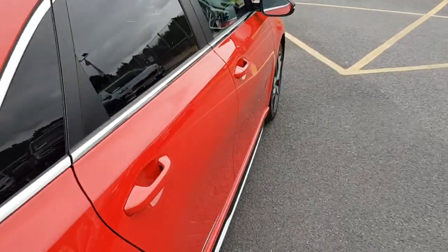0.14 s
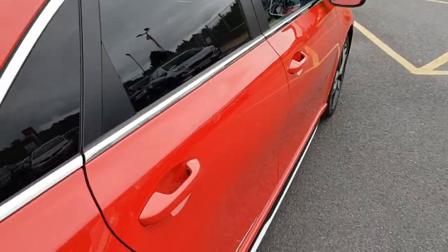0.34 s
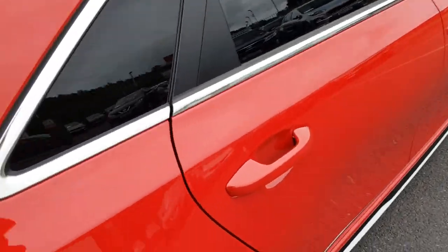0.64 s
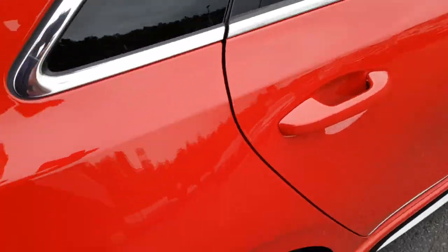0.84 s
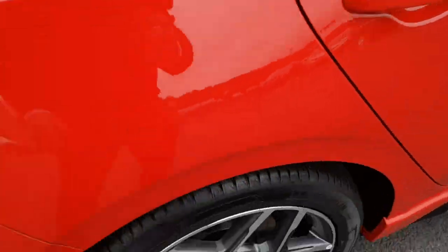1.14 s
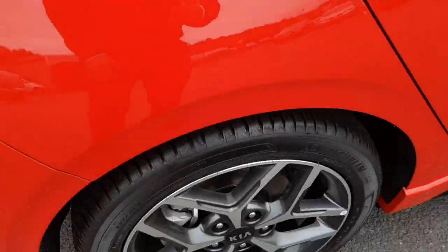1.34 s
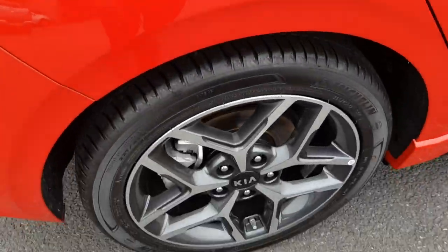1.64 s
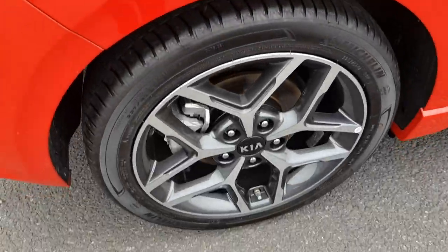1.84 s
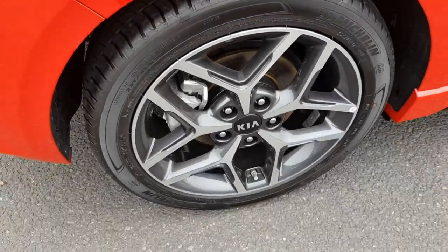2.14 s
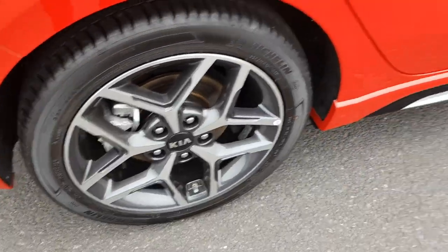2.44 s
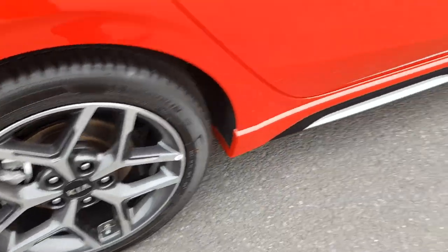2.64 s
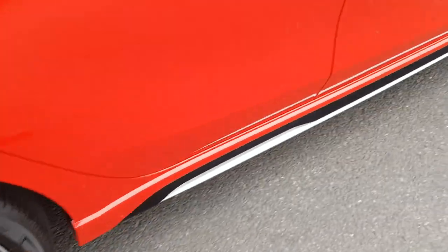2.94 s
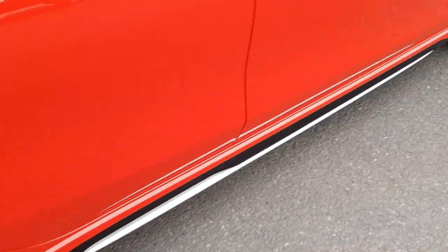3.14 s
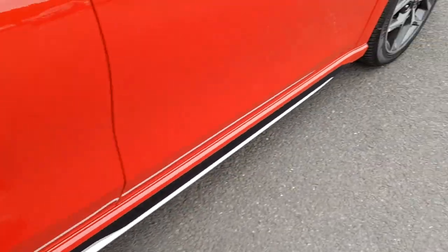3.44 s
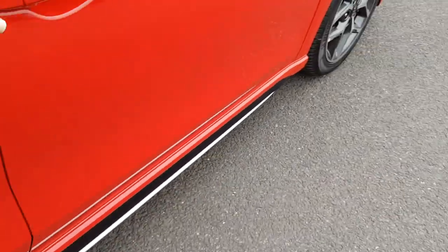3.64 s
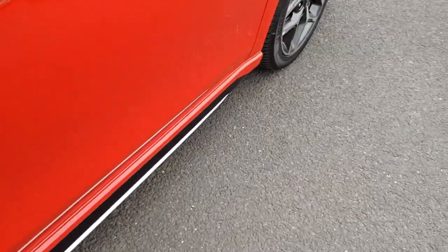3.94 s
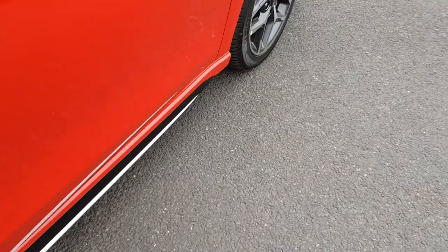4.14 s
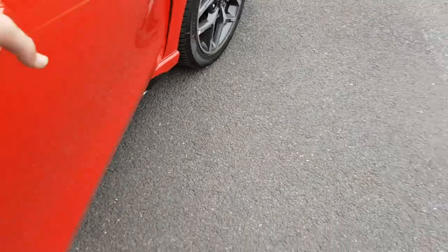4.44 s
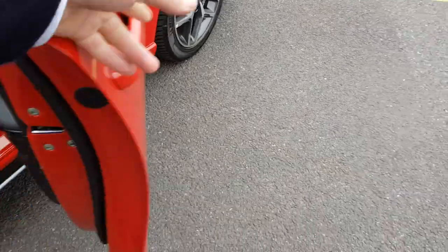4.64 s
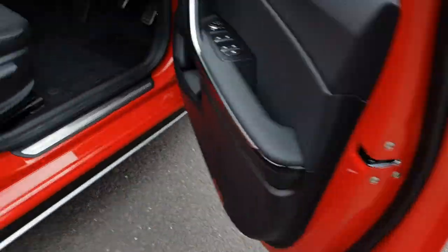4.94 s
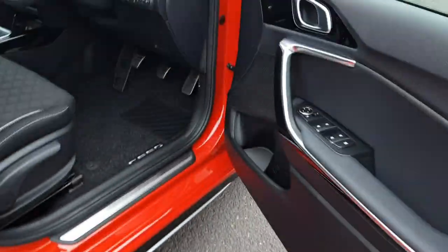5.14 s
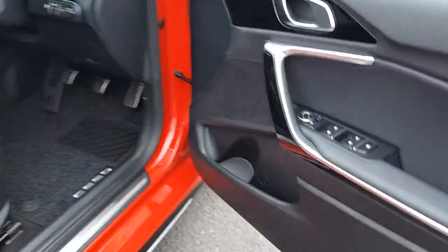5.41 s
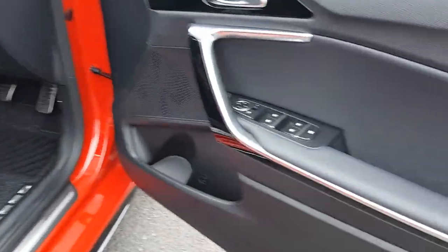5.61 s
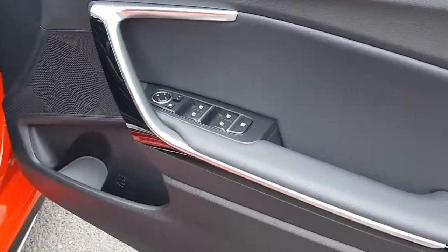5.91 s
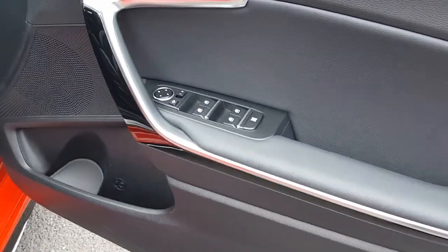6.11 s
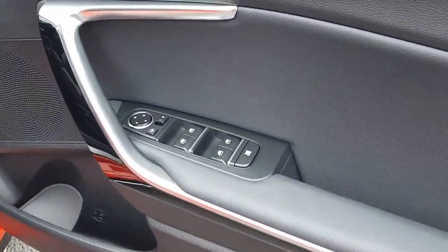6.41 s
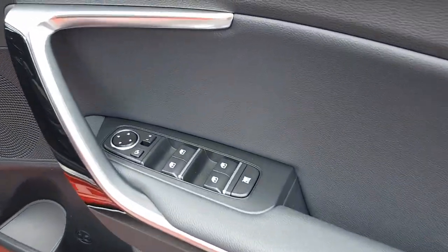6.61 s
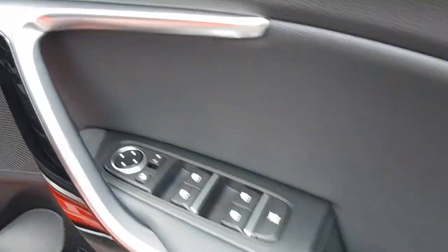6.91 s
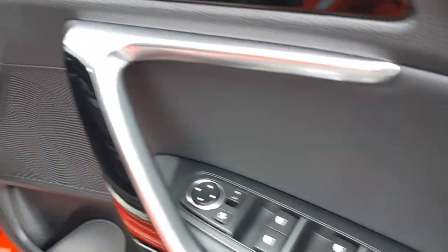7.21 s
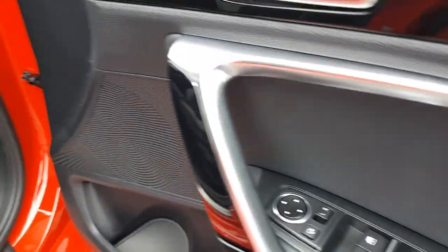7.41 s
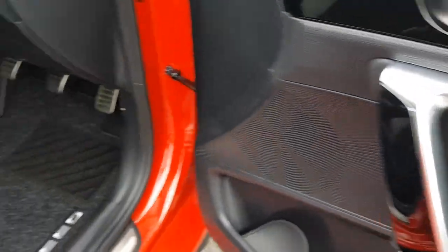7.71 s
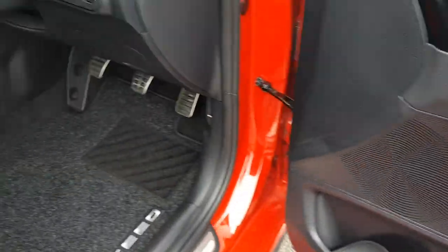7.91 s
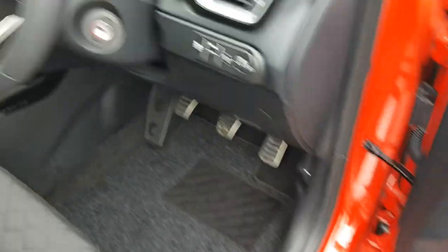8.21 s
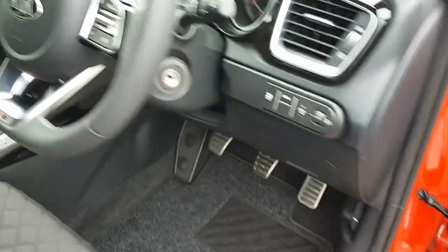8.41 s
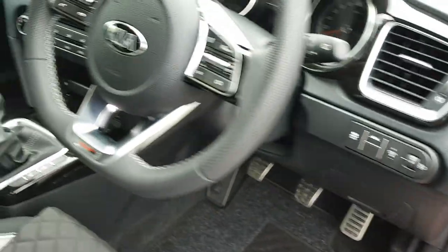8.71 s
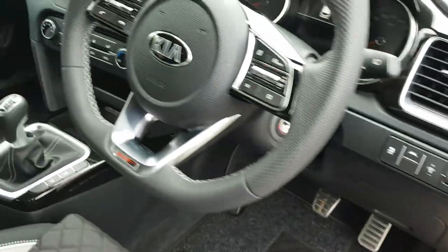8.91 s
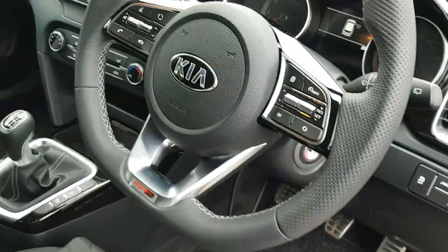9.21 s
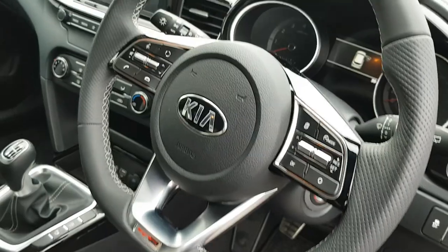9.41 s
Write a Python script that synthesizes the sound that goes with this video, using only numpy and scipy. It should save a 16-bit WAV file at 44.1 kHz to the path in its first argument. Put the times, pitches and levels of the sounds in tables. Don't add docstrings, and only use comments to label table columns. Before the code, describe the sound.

Outdoors in an open yard beside a busy road, heard by a hand-held phone. Cars stream past with low rumble and tyre roar. Small ticks, then a heavy car door slams close on the left, booming and rattling briefly, with a dull echo. The traffic dips in level, then recovers. Around four seconds a handle clicks, a lighter door unlatches and brushes open. Engine drone and passing cars continue.

```python
import sys
import numpy as np
from scipy import signal
from scipy.fft import rfft, irfft, next_fast_len
from scipy.io import wavfile
from scipy.ndimage import uniform_filter1d, map_coordinates

SR = 44100
rng = np.random.default_rng(int(sys.argv[2]) if len(sys.argv) > 2 else 0)


def undo_db(level):
    steps = np.asarray(level, float) / 20
    return 10 ** steps


def put_to_file(sound):
    columns = np.atleast_2d(sound).T
    safe = np.clip(columns, -1, 1)
    whole_steps = np.round(safe * 32767)
    wavfile.write(sys.argv[1], SR, whole_steps.astype(np.int16))


N = 421596
PORT_LAG = 21


def unit(x):
    return x / np.sqrt(np.mean(x ** 2) + 1e-20)


def along(points, hz):
    f, v = np.transpose(points)
    return np.interp(np.log(hz + 1), np.log(f + 1), v)


def curves(rows):
    s, *cols = np.transpose(rows)
    return [np.interp(np.arange(N) / SR, s, c) for c in cols]


def wobble(rate):
    steps = np.arange(0, N, 32)
    knots = rng.standard_normal(int(N * rate / SR) + 4)
    return np.interp(np.arange(N), steps, map_coordinates(knots, [steps * rate / SR]))


def filtered(x, response):
    m = next_fast_len(x.shape[-1] + 8192, True)
    return irfft(rfft(x, m) * response(np.fft.rfftfreq(m, 1 / SR)), m)[..., :x.shape[-1]]


def placed(x, side, pan_db):
    ears = np.array([[1], [-1]])
    travel_s = side * PORT_LAG / SR
    return filtered(x, lambda hz: undo_db(ears * pan_db / 2) * np.exp(-1j * np.pi * hz * travel_s * ears))


def ridged(x, centre_hz, octaves, lift_db):
    hz, t, z = signal.stft(x.astype(np.float32), SR, nperseg=1024)
    centre, lift = (np.interp(t, np.arange(N) / SR, v) for v in (centre_hz, lift_db))
    distance = np.log2((hz[:, None] + 1) / centre) / octaves
    ridge = lift * np.exp(-distance ** 2 / 2)
    return unit(signal.istft(z * undo_db(ridge).astype(np.float32), SR, nperseg=1024)[1][:, :N])


def swells(middle_s, half_s, order):
    t = np.arange(0, N, 64) / SR
    return 1 / (1 + np.abs((t - np.c_[middle_s]) / np.c_[half_s]) ** order)


def summed(shapes, db, floor_db):
    power = undo_db(db) ** 2 @ shapes + undo_db(floor_db) ** 2
    return np.interp(np.arange(N), np.arange(0, N, 64), 10 * np.log10(power))


def together(*db):
    return 10 * np.log10(sum(undo_db(one) ** 2 for one in db))


# f/Hz, share 0-1
DIRECT = [(60, 0.96), (200, 1), (400, 1), (900, 0.41), (2500, 0.43), (8000, 0.12)]


def rush(spectrum, right_share, patchy_db, size=N):
    z = signal.stft(rng.standard_normal((4, size), dtype=np.float32), nperseg=512)[2]
    field = uniform_filter1d(rng.standard_normal(z.shape[1:]), size=4, axis=0)
    field = uniform_filter1d(field, size=14, axis=1)
    noise = signal.istft(z * undo_db(patchy_db * unit(field)).astype(np.float32), nperseg=512)[1][:, :size]
    share = np.clip(right_share, 0, 1)
    late = np.roll(noise[:2], PORT_LAG, axis=1)
    from_right = np.sqrt(share) * np.array([late[0], noise[0]])
    from_left = np.sqrt(1 - share) * np.array([noise[1], late[1]])
    m = next_fast_len(size + 8192, True)
    hz = np.fft.rfftfreq(m, 1 / SR)
    clear = np.clip(along(DIRECT, hz), 0, 1)
    mixed = np.sqrt(clear) * rfft(from_right + from_left, m) + np.sqrt(1 - clear) * rfft(noise[2:], m)
    return unit(irfft(mixed * undo_db(along(spectrum, hz)), m)[:, :size])


# t/s nearest, half length/s, tyre roar level/dB, engine level/dB, tread song f/Hz
PASSES = [(-.1, 0.25, -35, -39.5, 830), (.3, 0.24, -32, -45.5, 850), (0.695, 0.2, -30, -43, 975),
          (2.703, 0.77, -36, -37.5, 900), (3.35, 0.66, -37, -47, 850), (3.926, 0.15, -35.5, -35, 780),
          (4.625, 0.23, -36.5, -44.5, 880), (5.004, 0.48, -34, -37, 700), (5.49, 0.43, -45, -43, 770),
          (6.608, 0.097, -38.5, -37.5, 760), (6.936, 0.4, -37.5, -38, 900),
          (7.402, 0.14, -39.5, -33.5, 950), (7.69, 0.23, -36.5, -31.5, 780), (8.56, 1, -38, -47, 870),
          (9.0, 0.46, -40.5, -47, 950)]
# t/s nearest, half length/s, roar level/dB, engine level/dB
PLAIN = [
    (1.35, 0.19, -36.5, -51.5),
    (2.112, 0.38, -34, -42.5),
    (6.303, 0.18, -40, -53),
    (8.105, 0.17, -47.5, -42),
    (9.6, 0.14, -37, -50),
]
FAR_ROAR_DB, FAR_BOOM_DB, FAR_TREAD_DB = -48, -54, -61.5
FAR_SONG_HZ = 850
DOPPLER, SHARP_DB = .04, 8.5
TREAD_OVER_ROAR_DB, PLAIN_TREAD_DB = -25.5, -23.5


def traffic():
    songless = [(*row, FAR_SONG_HZ) for row in PLAIN]
    s, half_s, roar_db, engine_db, song_hz = np.transpose([*PASSES, *songless])
    sings = np.arange(len(s)) < len(PASSES)
    near = swells(s, half_s, order=2)
    ahead = (np.c_[s] - np.arange(0, N, 64) / SR) / np.c_[half_s]
    heard = np.c_[undo_db(roar_db) ** 2] * near
    pitch = np.c_[song_hz] * (1 + DOPPLER * ahead / np.sqrt(1 + ahead ** 2))
    singing = heard[sings].sum(0)
    centre = (heard * pitch)[sings].sum(0) / singing
    sharp = SHARP_DB * singing / (heard.sum(0) + undo_db(FAR_ROAR_DB) ** 2)
    slow = [np.interp(np.arange(N), np.arange(0, N, 64), v) for v in (centre, sharp)]
    sizzle_db = summed(near, roar_db + np.where(sings, TREAD_OVER_ROAR_DB, PLAIN_TREAD_DB), FAR_TREAD_DB)
    return summed(near, roar_db, FAR_ROAR_DB), summed(near, engine_db, FAR_BOOM_DB), sizzle_db, *slow


# t/s middle, half length/s, level/dB, brightness/dB
SWISHES = [(0.453, .3, -59.5, 6.5), (1.25, .3, -63.5, 0), (2.352, 0.14, -64, -3), (2.78, 0.086, -63, 3),
           (2.97, .05, -64, 3), (3.31, 0.16, -66, 5), (3.667, 0.18, -61.5, 5), (4.1, 0.18, -61.5, 0.5),
           (4.503, 0.097, -49.5, -0.5), (4.69, .1, -52, -3), (4.886, 0.092, -53.5, 3.5),
           (5.246, 0.51, -63.5, -3), (6.36, .17, -65.5, 4.5)]
AIR_DB = -74
PUFF_S, PUFF_EVERY_S, PUFF_HALF_S = 5.79, .2525, .05
PUFF_DB, PUFF_FADES_DB_PER_S, PUFF_BRIGHT_DB = -67.5, .5, 0


def swish():
    s, half_s, db, bright_db = np.transpose(SWISHES)
    since = np.arange(16) * PUFF_EVERY_S
    puffs = swells(PUFF_S + since, np.full(len(since), PUFF_HALF_S), order=4)
    puff_db = summed(puffs, PUFF_DB - PUFF_FADES_DB_PER_S * since, -120)
    strokes = swells(s, half_s, order=4)
    brush_db = summed(strokes, db, AIR_DB)
    hiss_db = together(brush_db, puff_db)
    lifted_db = together(summed(strokes, db + bright_db, AIR_DB), puff_db + PUFF_BRIGHT_DB)
    return brush_db, hiss_db, lifted_db - hiss_db


# t/s, share 0-1
RIGHT = [(0, 0), (.7, 0.63), (1.05, 0.8), (1.7, 0.3), (2.2, 0.26), (2.6, 0.73), (3.5, 0.48), (4.5, 0.84),
         (5.5, 0.78), (6.5, 0.44), (7.5, 0.9), (8.5, 0.97), (9.56, 0.58)]
# f/Hz, level/dB per Hz
RUMBLE = [(13, -41.5), (28, -2), (45, 2.5), (65, 5.5), (151, -6), (220, -15), (290, -54), (480, -120)]
EXHAUST = [(120, -40), (180, 1.5), (250, 3.5), (350, 0), (480, -10.5), (700, -47)]
TYRES = [(300, -16.5), (430, -3), (560, -0.5), (700, -0.5), (900, 0), (1150, -1.5), (1500, -5.5),
         (1900, -11.5), (2400, -19), (3200, -49)]
TREAD = [(1400, -12.5), (2000, -6.5), (2900, -3), (4000, -13), (5500, -17.5), (7000, -29), (9000, -35)]
AIR = [(4000, -7), (6000, -8.5), (7260, -2), (8150, 0), (9560, -3.5), (11200, -2), (14200, -5),
       (15800, -14.5)]
RUMBLE_OVER_IDLE_DB, RUMBLE_OVER_ENGINE_DB, FAR_RUMBLE_DB = -4, 2, -37
TREAD_OVER_ENGINE_DB, TREAD_OVER_SWISH_DB = -26, -2.5
BRIGHT_HZ = 13000


def road():
    roar_db, exhaust_db, sizzle_db, centre_hz, sharp_db = traffic()
    brush_db, hiss_db, bright_db = swish()
    idle_db = curves(IDLE)[1]
    rumble_db = together(idle_db + RUMBLE_OVER_IDLE_DB, exhaust_db + RUMBLE_OVER_ENGINE_DB, FAR_RUMBLE_DB)
    tread_db = together(sizzle_db, exhaust_db + TREAD_OVER_ENGINE_DB, brush_db + TREAD_OVER_SWISH_DB)
    right, swell = curves(RIGHT)[0], wobble(6)
    low = undo_db(rumble_db + 2.0 + 0.26 * wobble(5.1)) * rush(RUMBLE, right, patchy_db=0.5)
    boom = undo_db(exhaust_db + 0.57 + 0.98 * wobble(25)) * rush(EXHAUST, right, patchy_db=1.0)
    sung = ridged(rush(TYRES, right, patchy_db=1.15), centre_hz, octaves=0.31, lift_db=sharp_db)
    roar = undo_db(roar_db + 4.0 + 0.37 * swell) * sung
    tread = undo_db(tread_db + 4.5 + .5 * swell) * rush(TREAD, right, patchy_db=1.0)
    spray = ridged(rush(AIR, right, patchy_db=2.5), np.full(N, BRIGHT_HZ), octaves=0.38, lift_db=bright_db)
    hiss = undo_db(hiss_db + 3.5 + 1.4 * wobble(20)) * spray
    return low + boom + roar + tread + hiss


def drone(rows, drift_hz, flutter_db):
    hz, db = curves(rows)
    first, last = rows[0][0], rows[-1][0]
    on = np.interp(np.arange(N) / SR, [first - .2, first, last, last + 0.35], [0, 1, 1, 0])
    phase = 2 * np.pi * np.cumsum(hz + drift_hz * wobble(11)) / SR
    return on * undo_db(db + 5.5 + flutter_db * wobble(7.4)) * np.sin(phase)


# t/s, firing rate f/Hz, level/dB
IDLE = [(0, 58.5, -35.5), (1.1, 58.5, -33), (2.2, 60, -31.5), (3.0, 59.5, -35), (3.9, 60, -30.5),
        (4.5, 59.5, -31), (5.3, 59, -31.5), (6.0, 60.5, -38), (6.4, 62.5, -33.5), (7.6, 61.5, -40),
        (8.2, 61.5, -36), (8.9, 59.5, -44), (9.56, 58, -53)]
# t/s, drone f/Hz, level/dB
LORRY = [
    (3.3, 149, -46),
    (4.5, 142, -43),
    (5.6, 132.5, -38),
    (6.2, 128, -37),
    (6.8, 125, -39),
    (8.1, 122.5, -37),
    (8.7, 123, -41),
    (9.1, 121, -48),
]
# t/s, f/Hz, level/dB
ORDERS = [
    [(3.4, 220, -55), (3.9, 219, -47), (4.6, 213, -54), (5.2, 210, -52)],
    [(5.3, 92, -39), (6.0, 90, -36), (6.8, 88, -49), (7.6, 86, -41), (8.4, 84, -47)],
]


def engines():
    near = drone(IDLE, drift_hz=1.6, flutter_db=2.5) + drone(LORRY, drift_hz=.6, flutter_db=2.2)
    far = sum(drone(rows, drift_hz=1.29, flutter_db=3.0) for rows in ORDERS)
    return placed(near + far, .5, .3)


DUCK_S, DUCK_DB, DUCK_FALL_S, DUCK_HOLD_S, DUCK_RISE_S = 0.7, -9.5, 0.33, 1.93, 0.88


def ducking():
    corners = DUCK_S + np.cumsum([0, DUCK_FALL_S, DUCK_HOLD_S, DUCK_RISE_S])
    return undo_db(DUCK_DB * np.interp(np.arange(N) / SR, corners, [0, 1, 1, 0]))


def shaking(spectrum, start, level_db, t60, cut):
    t, out = np.arange(SR) / SR, np.zeros((2, N))
    turned_down = 1 + np.exp(np.clip((t - cut) / 0.027, -50, 50))
    shape = undo_db(-60 * t / t60 + 1.8 * wobble(150)[:SR]) / turned_down
    noise = rush(spectrum, 0.15, patchy_db=1.0, size=SR)
    out[:, round(start * SR):][:, :SR] = undo_db(level_db) * shape * noise * undo_db([[4], [-4]])
    return out


# f/Hz, level/dB per Hz
ECHO = [(100, -20), (220, 0), (500, -0.5), (900, 1), (1300, -15), (2500, -30), (5000, -70)]


def yard():
    return shaking(ECHO, start=.87, level_db=-36, t60=1.45, cut=0.42)


# f/Hz, level/dB per Hz
RATTLE = [(100, -28), (200, 24.5), (400, 16.5), (700, 4), (1500, 1.5), (3000, -6.5), (6000, -16),
          (12000, -12.5), (16000, -20)]


def rattle():
    return shaking(RATTLE, start=.827, level_db=-15.5, t60=0.26, cut=0.13)


def clicks(rows, t60, pan_db):
    out, t = np.zeros((2, N + SR)), np.arange(SR // 10) / SR
    decay = undo_db(-60 * t / t60) + 0.041 * undo_db(-15 * t / t60)
    envelope = decay * (1 - np.exp(-t / 0.00058))
    for s, db, centre_hz, spread in rows:
        noise = rng.standard_normal((3, len(t)))
        scattered = noise[0] + 1.3 * noise[1:]
        burst = filtered(scattered, lambda hz: np.exp(-(np.log2((hz + 1) / centre_hz) / spread) ** 2 / 2))
        out[:, round(s * SR):][:, :len(t)] += placed(unit(burst) * undo_db(db - 9) * envelope, -0.774, pan_db)
    return out[:, :N]


# t/s, peak level/dB, centre f/Hz, spread/octaves
TICKS = [
    (.0154, -57, 13800, 0.17),
    (.1544, -44, 14600, 0.22),
    (.536, -31, 11600, .31),
    (.5406, -27.5, 10500, .55),
    (.6866, -31, 14100, .14),
    (1.4882, -49, 13400, 0.48),
    (2.0986, -58, 7000, 0.65),
    (3.5254, -43, 11000, 0.72),
    (4.5644, -25.5, 8000, .8),
    (5.3602, -43, 10900, .6),
]
STRIKER = [
    (.8215, -25, 9000, 1),
    (.8256, -8, 4500, 1.8),
    (.8295, -16, 3000, 1.8),
    (.8738, -30, 9000, 1.2),
]
HANDLE = [
    (4.0334, -36, 11000, .7),
    (4.042, -38, 5600, 1.3),
    (4.047, -37, 5000, 1.1),
    (4.0556, -29, 7000, 1.1),
    (4.06, -33, 4500, 0.92),
    (4.0681, -22, 10200, 0.73),
    (4.0727, -30, 8000, 0.42),
    (4.083, -35, 13000, .3),
]
LATCH = [
    (4.1012, -27, 9960, 0.83),
    (4.1066, -23, 11500, 0.61),
    (4.1095, -24, 1200, 0.85),
    (4.1118, -23.5, 2800, 1),
    (4.12, -13.5, 1500, 0.72),
    (4.132, -35, 5000, 1.2),
    (4.139, -38, 5000, 1.9),
    (4.147, -45, 6000, 1.1),
    (4.2882, -33, 13500, .2),
]
# t/s, peak level/dB
PAWL = [
    (4.042, -31),
    (4.068, -24),
    (4.1392, -27),
    (4.564, -24),
]
PAWL_HZ, PAWL_OCTAVES = 3420, 0.27


def contacts():
    lever = [(s, db, PAWL_HZ, PAWL_OCTAVES) for s, db in PAWL]
    loose = clicks(TICKS, t60=0.015, pan_db=19)
    slam = clicks(STRIKER, t60=0.022, pan_db=17)
    pull = clicks(HANDLE, t60=0.016, pan_db=15.5)
    release = clicks(LATCH, t60=0.033, pan_db=4) + clicks(lever, t60=0.024, pan_db=1)
    return loose + slam + pull + release


def panel(blows, modes, gain_db):
    out, t = np.zeros(N + SR), np.arange(SR // 2) / SR
    ring = sum(undo_db(db - 60 * t / t60) * np.sin(2 * np.pi * hz * t) for hz, db, t60 in modes)
    for s, strength, contact_ms in blows:
        push = np.sin(np.pi * np.clip(t[:SR // 50] * 1000 / contact_ms, 0, 1))
        struck = signal.fftconvolve(ring, push / push.sum())[:len(t)]
        out[round(s * SR):][:len(t)] += strength * struck
    return undo_db(gain_db) * out[:N]


# t/s, signed strength, contact/ms
RELEASE = [
    (4.1028, -1, 2.33),
    (4.1095, -0.1, 2.2),
    (4.112, 0.42, 0.14),
    (4.122, -.4, 3.5),
    (4.1255, 0.57, 2.34),
    (4.138, 0.39, 2.9),
    (4.568, -0.077, 1.9),
    (4.577, -0.3, 2.9),
    (.541, 0.19, 2.4),
]
# f/Hz, level/dB, t60/s
FRONT_DOOR = [(132, -5, 0.1), (210, -19, 0.038), (240, -2.5, 0.035), (295, -12, 0.097), (388, 7.5, 0.12),
              (465, 9.5, 0.037), (571, -6, 0.07), (760, -12, 0.038), (990, 7, 0.033), (1270, 9.5, 0.042),
              (1730, 8, 0.014), (2510, 2, 0.0056), (3200, -7, .015), (3640, -14, .02)]


def front_door():
    return placed(panel(RELEASE, FRONT_DOOR, gain_db=-12), -0.67, 2.5)


# t/s, signed strength, contact/ms
SLAM = [
    (.8203, -0.26, 1.2),
    (.8217, 0.11, 1.5),
    (.8233, -0.17, 1.3),
    (.8255, -0.31, 0.12),
    (.829, -2, 13.7),
    (.8375, 0.5, 2.14),
    (.851, -1.29, 3.9),
    (.862, -0.035, 3.8),
    (.874, 0.21, 2.6),
]
# f/Hz, level/dB, t60/s
REAR_DOOR = [(46.7, -5, 0.52), (61.4, 0.5, 0.09), (86, 6.5, 0.33), (104, -13, 0.3), (127, -26, .15),
             (138.8, -6, 0.37), (205, -18, 0.058), (220, -5.5, 0.19), (255.5, -12, 0.14), (286, -6.5, 0.24),
             (321, -6, 0.053), (420, 3, 0.028), (446, -22.5, .1), (530, -2.5, 0.031), (720, -6.5, .08),
             (850, -1, 0.083), (1094, 9, 0.039), (1470, -6, .03), (2010, 3, .02)]


def rear_door():
    return placed(panel(SLAM, REAR_DOOR, gain_db=-5.5), -0.71, 1.5)


def scene():
    background = ducking() * (road() + engines())
    return background + yard() + rattle() + contacts() + front_door() + rear_door()


def roll_off(x):
    return signal.sosfilt(signal.butter(12, 16450, fs=SR, output="sos"), x)


def record(dry):
    heard = filtered(dry, lambda hz: (1j * hz / (34 + 1j * hz)) ** 4)
    rounded = heard / (1 + np.abs(heard / 1.3) ** 6) ** (1 / 6)
    mix = filtered(rounded, lambda hz: hz < 15830)
    return roll_off(mix)


dry = scene()
out = record(dry)
put_to_file(out)
```